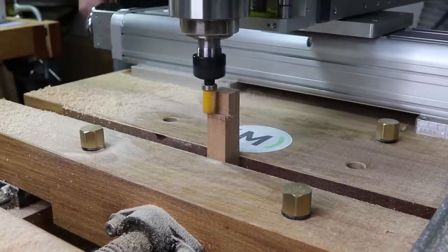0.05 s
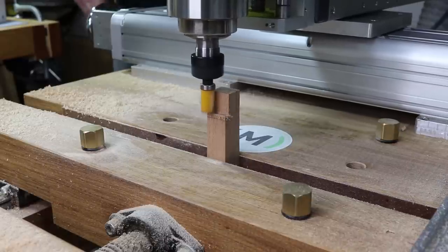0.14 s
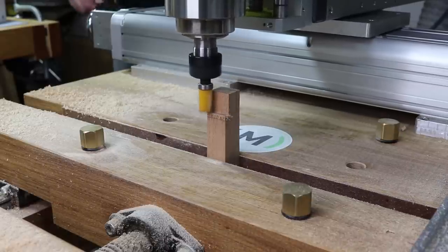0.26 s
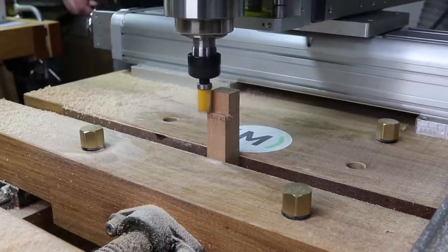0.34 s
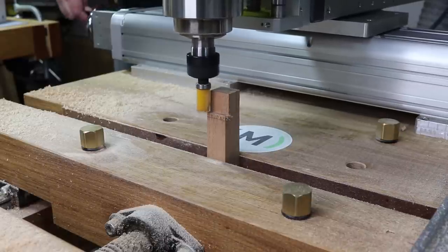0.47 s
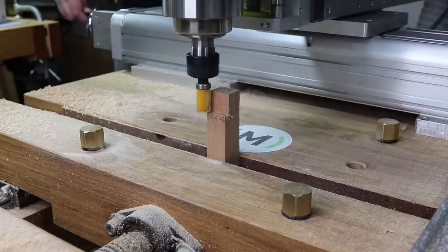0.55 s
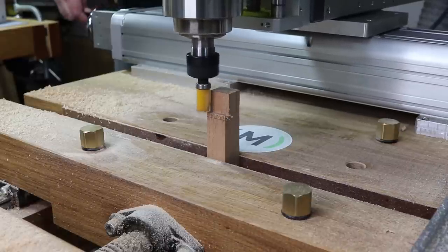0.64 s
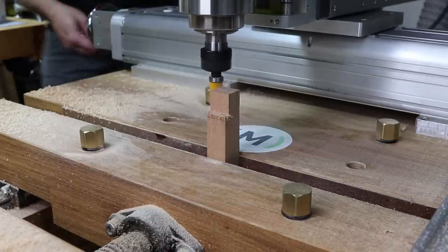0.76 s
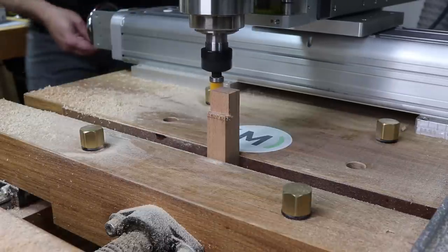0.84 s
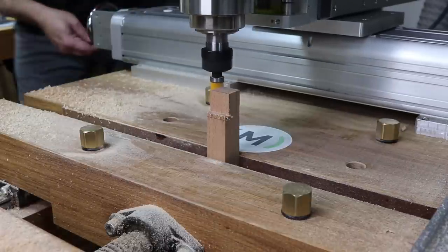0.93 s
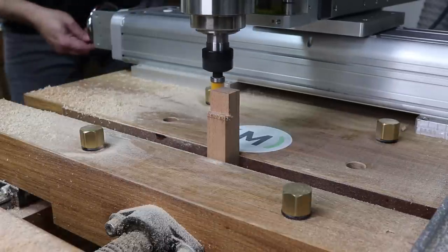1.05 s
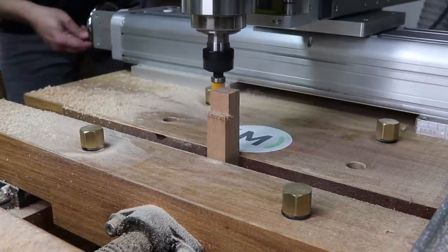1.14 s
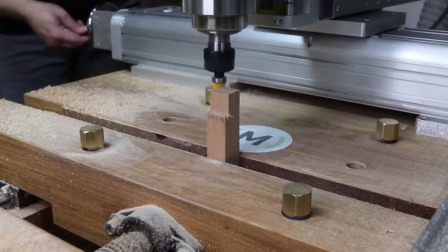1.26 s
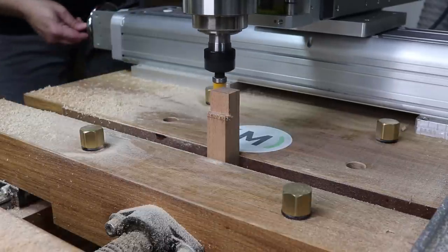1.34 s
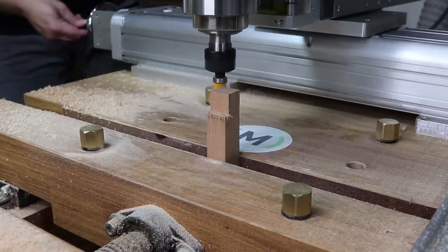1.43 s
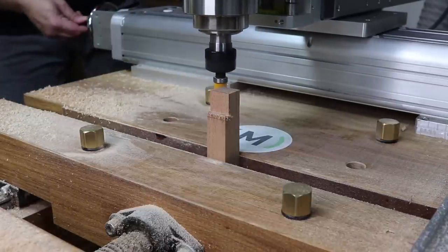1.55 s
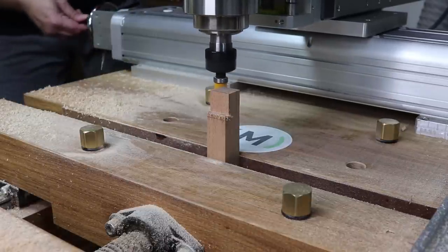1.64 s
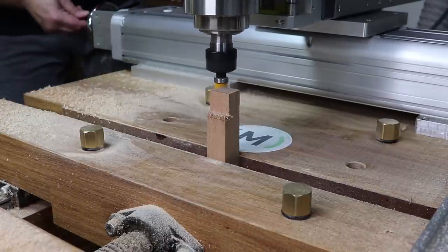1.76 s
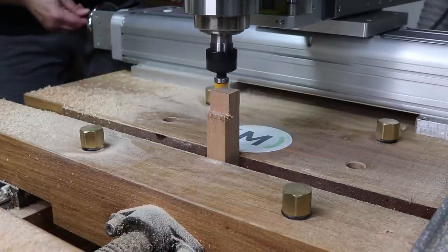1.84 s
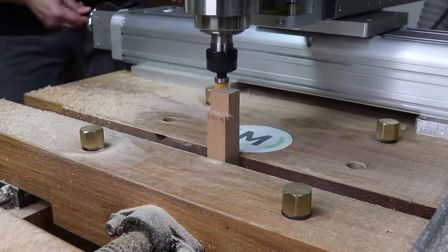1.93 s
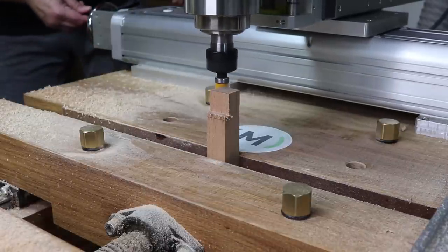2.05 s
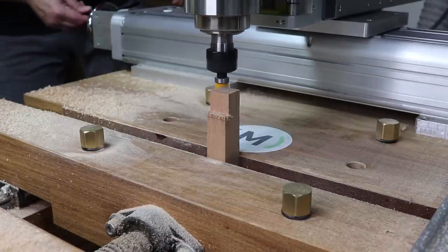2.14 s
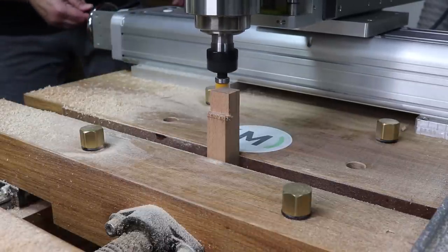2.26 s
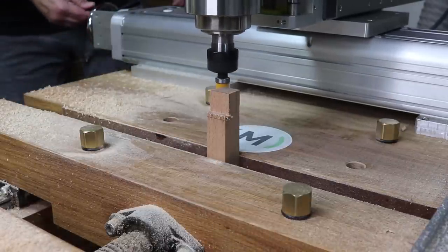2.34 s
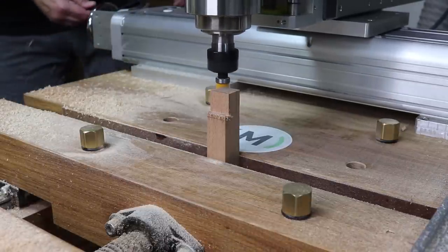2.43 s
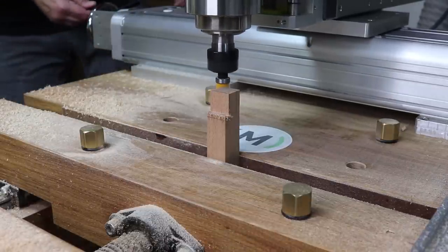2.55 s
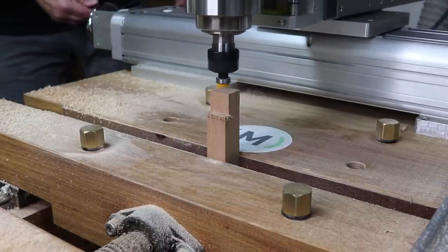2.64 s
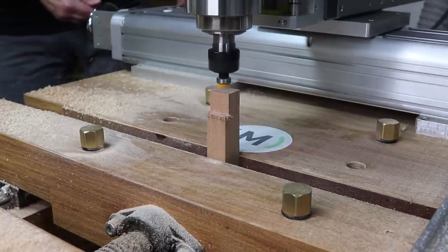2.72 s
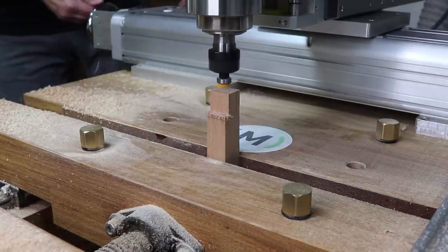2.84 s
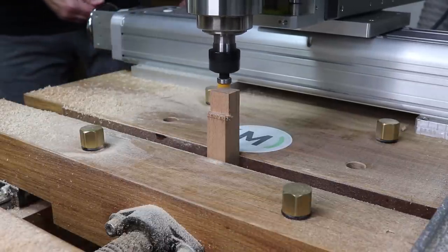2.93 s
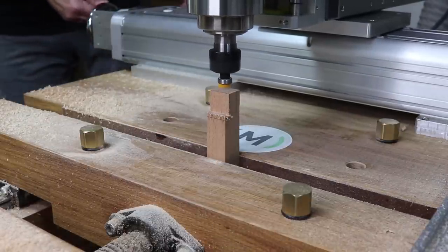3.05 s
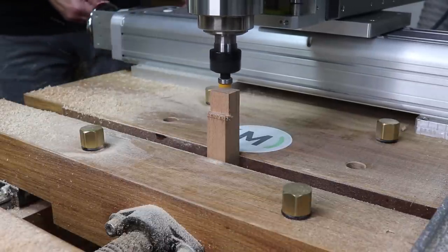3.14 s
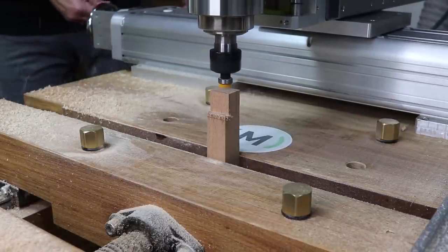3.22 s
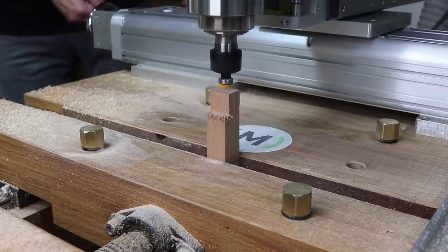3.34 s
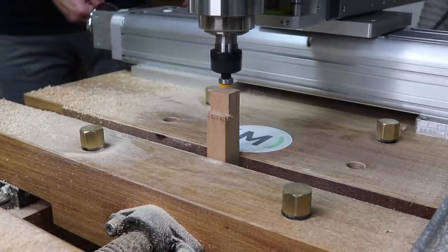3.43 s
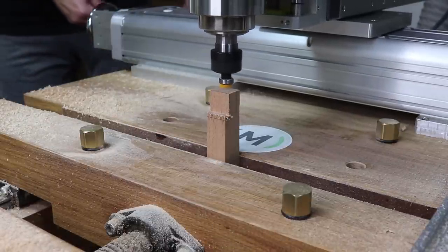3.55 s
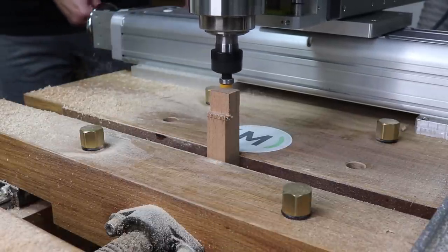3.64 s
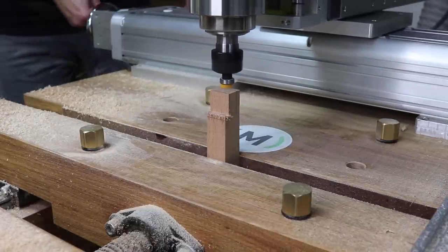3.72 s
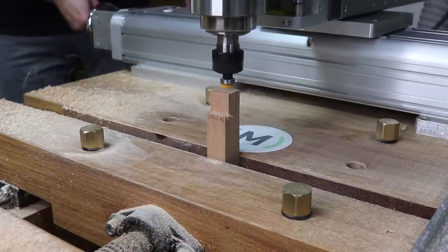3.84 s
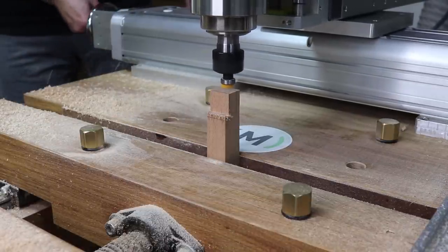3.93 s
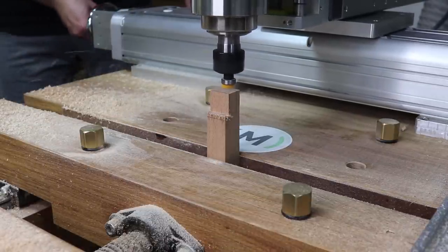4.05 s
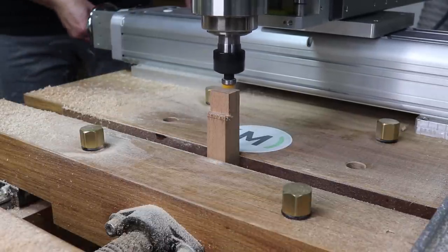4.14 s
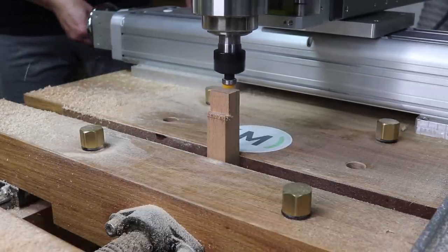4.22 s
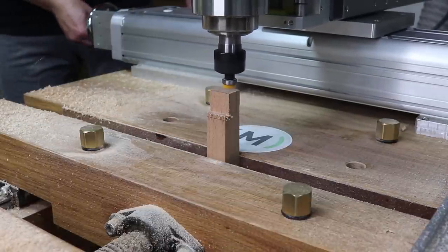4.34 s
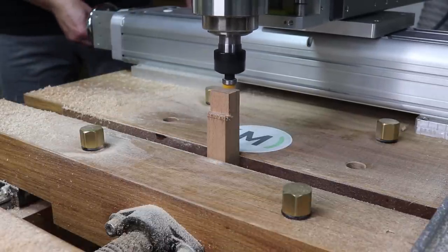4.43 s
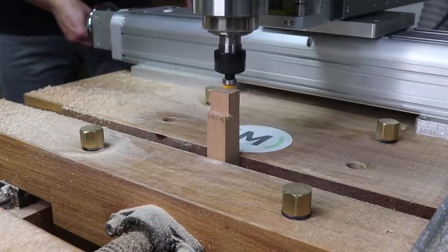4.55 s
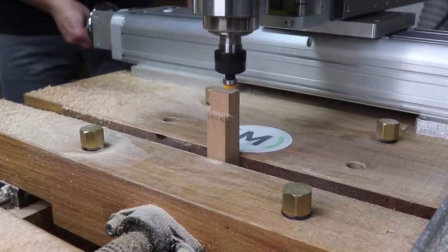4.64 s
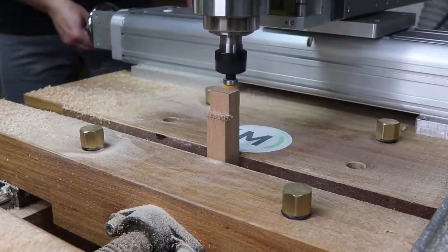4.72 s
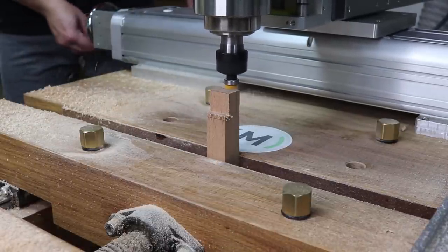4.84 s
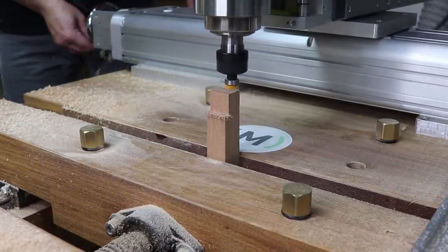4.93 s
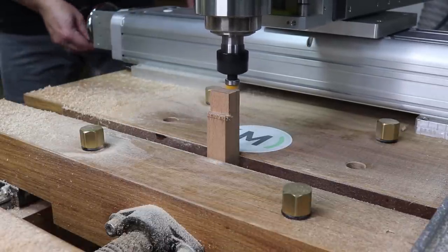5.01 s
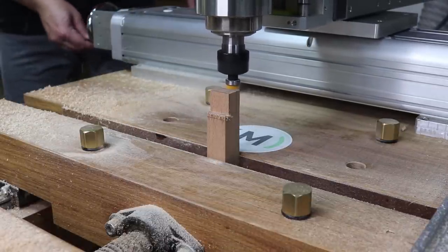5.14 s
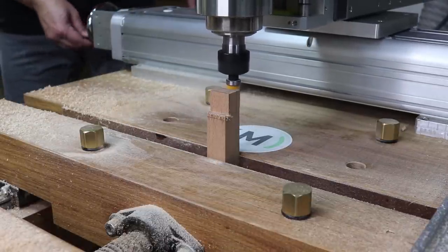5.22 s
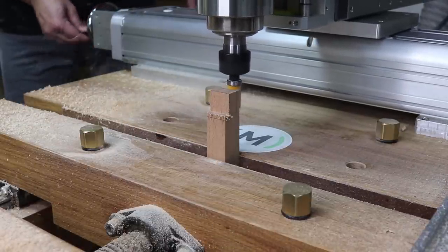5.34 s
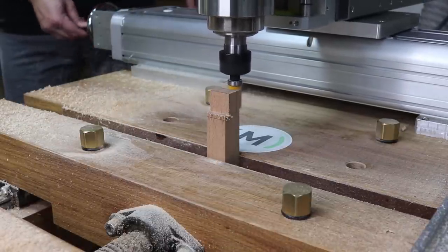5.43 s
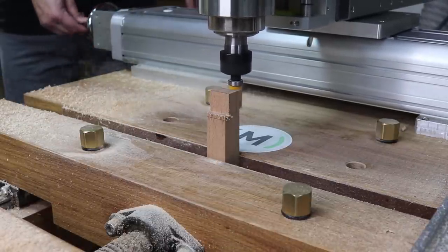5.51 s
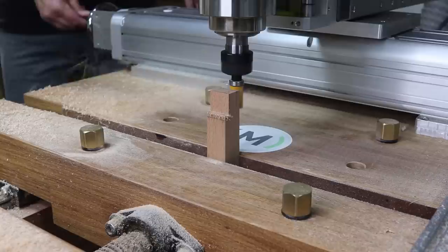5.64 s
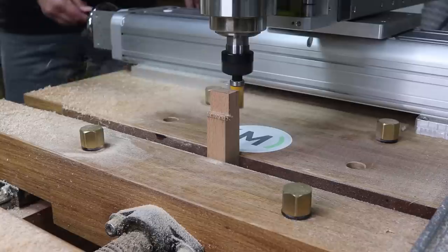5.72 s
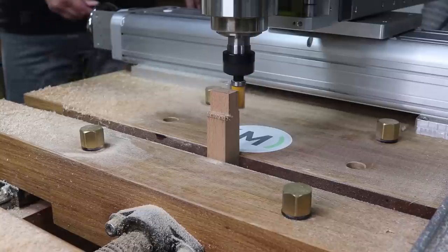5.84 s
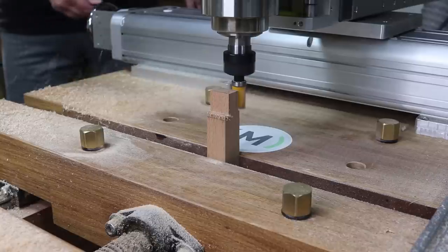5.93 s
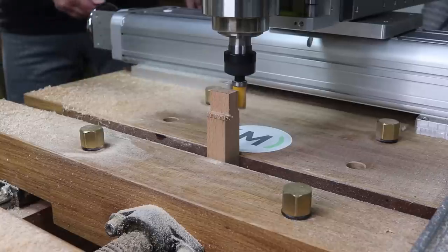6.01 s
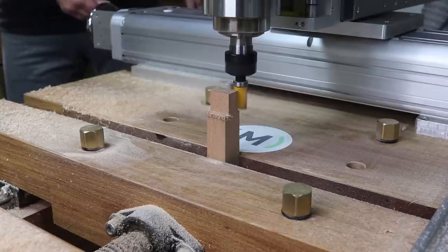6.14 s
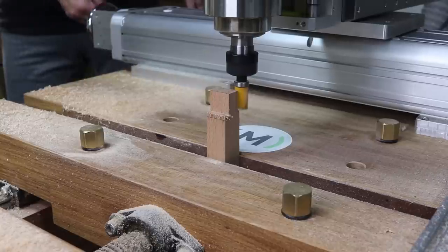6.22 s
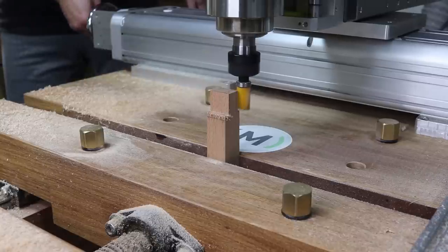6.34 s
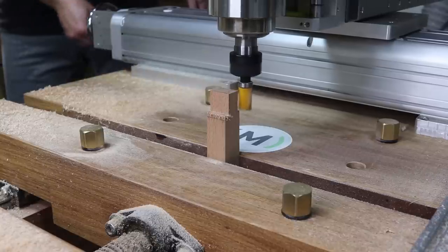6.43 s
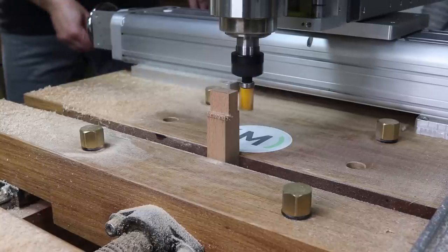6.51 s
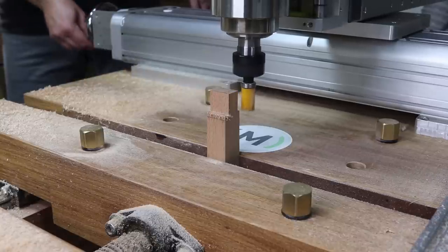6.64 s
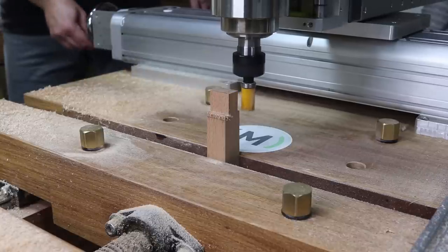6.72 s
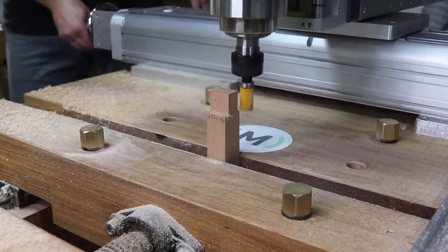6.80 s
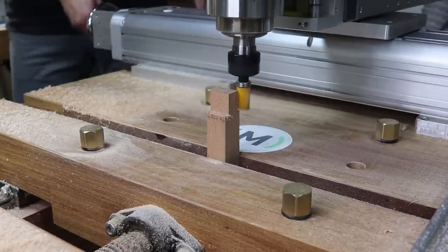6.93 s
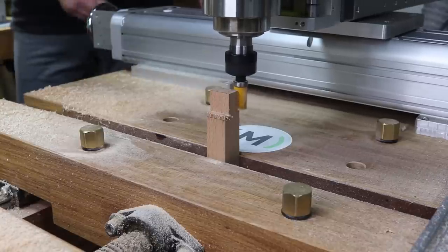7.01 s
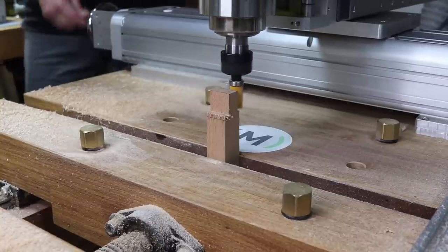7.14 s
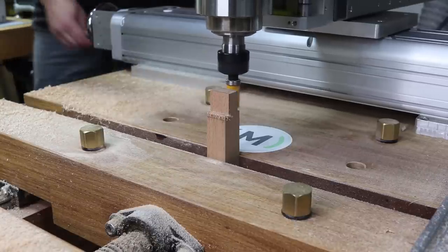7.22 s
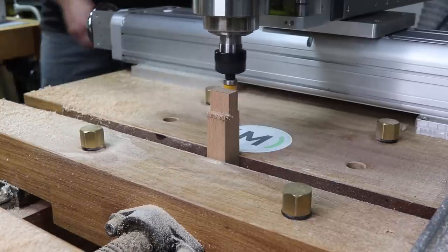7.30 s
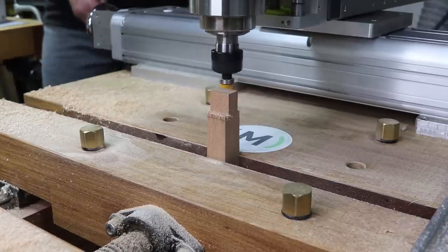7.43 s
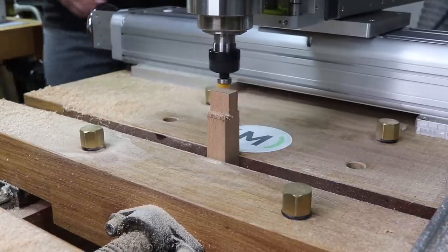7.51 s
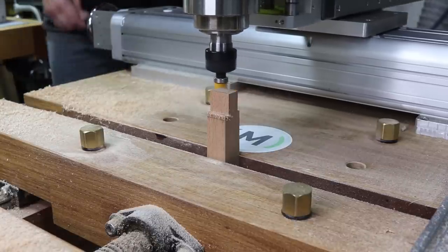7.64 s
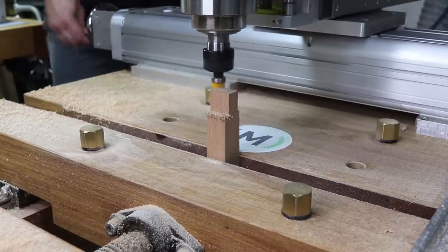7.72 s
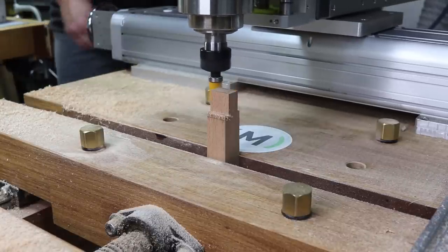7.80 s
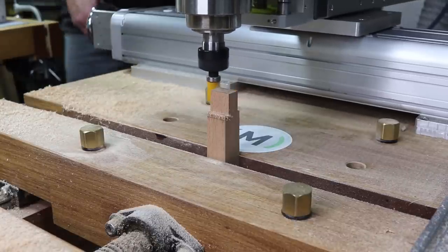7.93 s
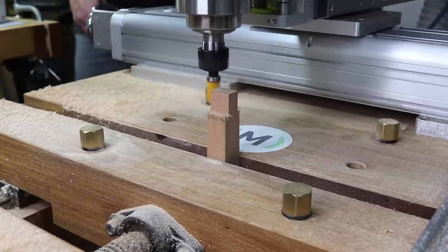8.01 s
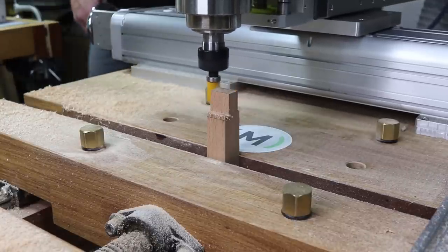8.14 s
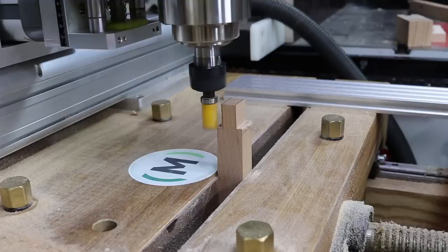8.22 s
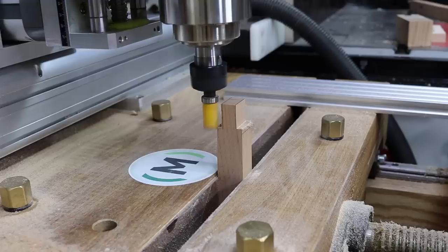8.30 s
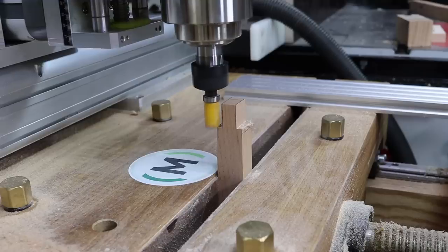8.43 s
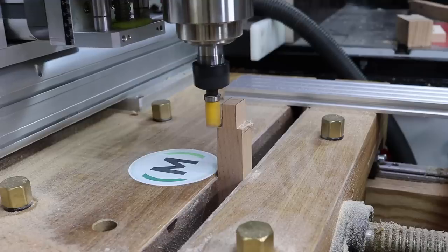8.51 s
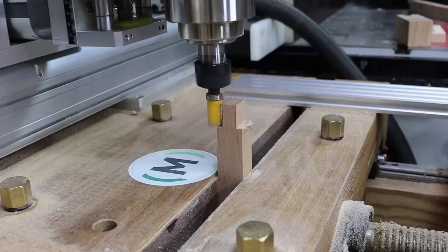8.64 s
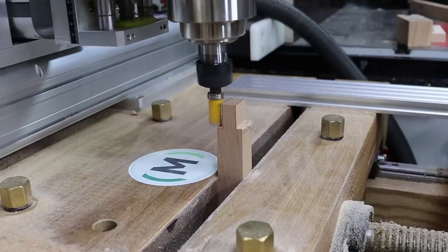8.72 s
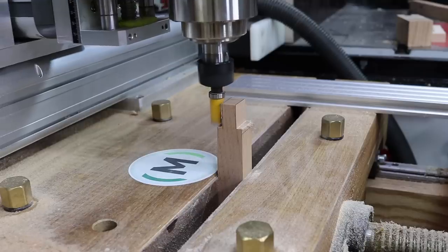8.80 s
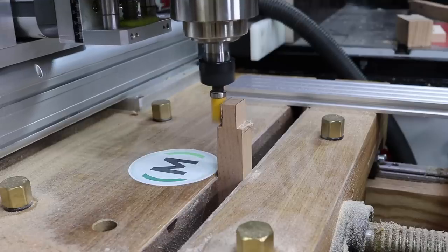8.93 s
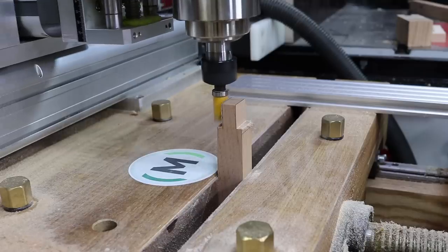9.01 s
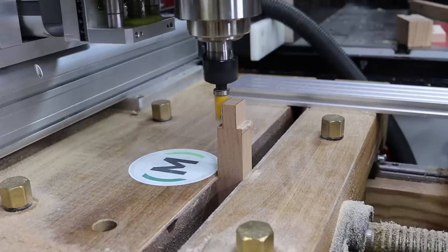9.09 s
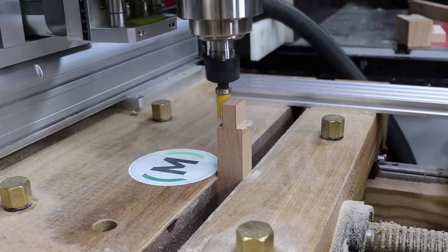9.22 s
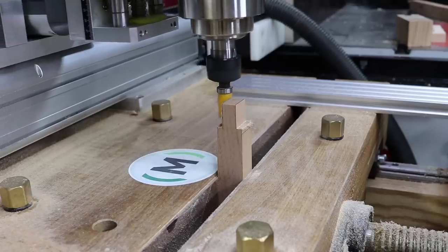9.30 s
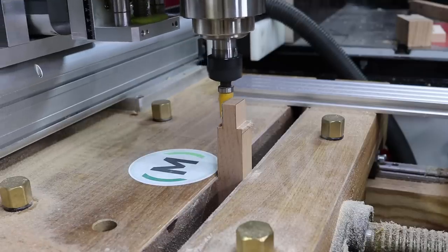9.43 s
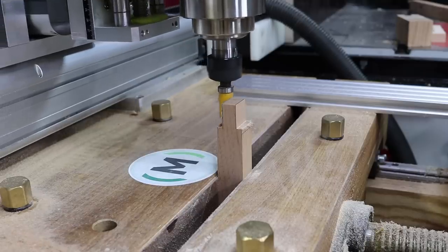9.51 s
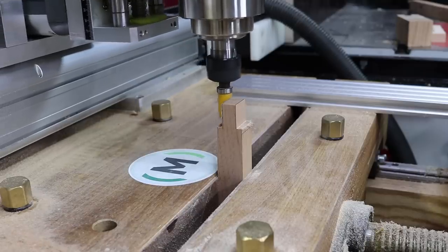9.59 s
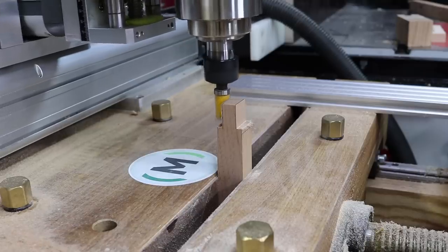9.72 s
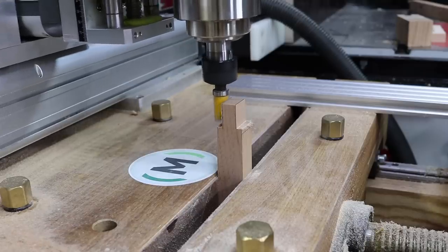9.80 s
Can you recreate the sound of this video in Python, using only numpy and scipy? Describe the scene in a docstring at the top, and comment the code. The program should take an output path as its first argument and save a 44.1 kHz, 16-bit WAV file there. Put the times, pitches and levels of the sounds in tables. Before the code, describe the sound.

Close stereo pickup of a small milling machine cutting an upright wooden post. A steady high whine and broad air hiss never stop. The bit skims with a fading buzz, pauses, then bites hard in surges with rough chatter, gritty chips and a piercing squeal. After it clears, two brief skims follow; from another position come a smooth buzzing cut and a final short touch.

```python
"""A two-flute router bit mills a wooden post; its seven-blade fan whines over rushing air throughout.
First a light pass adds shaft overtones. Then comes the deep pass, fed in pushes: the post chatters and
rings, side tones surround each overtone, chips rasp, and for a while the bit squeals.
Two more light passes follow; the microphone then changes place and hears two clean cuts with chips.
Most tones are sines locked to one shaft angle; air, chips and machine rumble are shaped stereo noise."""
import sys
import numpy as np
from scipy import signal
from scipy.fft import rfft, irfft, next_fast_len
from scipy.io import wavfile
from scipy.ndimage import uniform_filter1d

SR = 44100
rng = np.random.default_rng(int(sys.argv[2]) if len(sys.argv) > 2 else 0)


def to_wav(s):
    """Save 16-bit WAV."""
    ch = np.atleast_2d(s).T  # columns
    pcm = np.round(np.clip(ch, -1, 1) * 32767)  # PCM
    wavfile.write(sys.argv[1], SR, pcm.astype(np.int16))


N = 434805
BLADES = 7
MOVED = np.arange(N) > 8.29 * SR  # true once the microphone has changed place
# shaft multiples that the flutes excite, one row each in the tone tables; the fan covers 7 and 14
MULTIPLES = [k for k in range(2, 43) if k not in (7, 14)]
# squeal course: t/s, lowest ringing f/Hz, level/dB added to each tone, roughness/0-1
SQUEAL = [(4.24, 8200, -26, 0.08), (4.3, 8200, -12, .3), (4.36, 8200, -1.5, 0.1), (4.6, 8200, -1.5, .02),
          (4.66, 7320, 1, 0.03), (4.8, 8800, -1, 0.24), (4.95, 11200, -4, 0.85), (5.1, 12200, 0, 0.7),
          (5.35, 13300, -12, 0.7), (5.5, 13870, -29, .5)]
# stereo place of each flute overtone at the first place: left-right/dB, left lead/rad
FIRST_PLACE = [(5, 1.2), (6, -0.5), (-2, -1.5), (-3.5, 1.4), (-0.5, 1.25), (4.5, 0), (1, 0.3), (0, 1.1),
               (1, 0.2), (-4, 0), (22, 2.5), (-10, -7), (6, 3), (-15, 5), (-17, 2.5), (11, -6.5), (-6, 1.5),
               (1, -1), (7, 1.7), (-6, -6), (14, 0.8), (10, -3), (-14, 6.5), (2, 0), (4, -1.5), (2, 1),
               (-3, 0.06), (6, -6), (10, 6), (-1, -13), (6, 10), (2, -7), (1, 0), (3, 0.3), (5, -2), (4, 1),
               (7, 3.5), (5, 0.0), (5, 1)]
# the hand feeds in pushes: start/s, length/s, build-up/s, tone surge/dB, low overtones/dB,
# high overtones/dB, chatter/dB, chips/dB and post ring/dB at start, at end (chips and ring before trims)
PUSHES = [(1.455, 0.61, .17, 4, 0, -2.5, -0.5, -33, -54, -47),
          (2.26, 0.17, 0.092, 8, -2.5, -4, 2, -30.5, -39, -37),
          (2.642, 0.19, 0.09, 8.5, -3.5, -6.5, 2, -28, -31, -34),
          (2.985, .22, 0.11, 6.5, -1, -6, 2.5, -28.5, -35, -29),
          (3.31, 0.23, 0.045, 3.5, 1.5, -2.5, 0, -29.5, -32, -35),
          (3.574, 0.8, 0.072, 2.5, .5, -2, 1, -28.5, -28.5, -34),
          (4.585, 1.36, 0.1, 4, 0.5, -1, -0.5, -28.5, -29.5, -27)]


def amp(db):
    """Gain of a level in dB."""
    return 10 ** (np.asarray(db) / 20)


def unit(x):
    """x at rms 1."""
    return x / np.sqrt(np.mean(np.abs(x) ** 2) + 1e-20)


def along(points, hz):
    """Read (Hz, value) points on a log frequency axis."""
    f, v = np.transpose(points)
    return np.interp(np.log(hz + 1), np.log(f + 1), v)


def curves(rows, part=slice(None)):
    """One value per sample for each column after the time."""
    s, *cols = np.transpose(rows)
    return [np.interp(np.arange(N)[part] / SR, s, c) for c in cols]


def span(rows):
    """The samples between a table's first and last time."""
    return slice(int(rows[0][0] * SR), int(rows[-1][0] * SR))


def wobble(rate, size=N):
    """A random curve with `rate` knots a second."""
    knots = rng.standard_normal(int(N * rate / SR) + 4)
    return np.interp(np.arange(size) * rate / SR, np.arange(len(knots)), knots)


def filtered(x, response):
    """x times a response of frequency."""
    m = next_fast_len(N + 8192)
    return irfft(rfft(x, m) * response(np.fft.rfftfreq(m, 1 / SR)), m)[..., :N]


def rush(spectrum, alike, patchy_db):
    """Shaped stereo noise of rms 1, with patches of random gain in time and frequency."""
    z = signal.stft(rng.standard_normal((2, N)), nperseg=512)[2]
    field = rng.standard_normal(z.shape[1:])
    field = uniform_filter1d(uniform_filter1d(field, size=6, axis=0), size=12, axis=1)
    pair = signal.istft(z * amp(patchy_db * unit(field)), nperseg=512)[1][:, :N]

    def mid_side(hz):
        # the mid-side mix angle sets how alike left and right are
        turn = np.arccos(np.clip(along(alike, hz), -1, 1)) / 2
        return amp(along(spectrum, hz)) * [np.cos(turn), np.sin(turn)]

    mid, side = filtered(pair, mid_side)
    return unit(np.array([mid + side, mid - side]))


def placed(tone, pan_db, lead):
    """A complex tone in stereo by level and phase difference; a tone of modulus 1 gets rms 1."""
    left = 2 / np.sqrt(1 + amp(-2 * pan_db)) * (tone * np.exp(1j * lead)).real
    return np.array([left, 2 / np.sqrt(1 + amp(2 * pan_db)) * tone.real])


def overtone(angle, multiple, waver_db, drift):
    """One shaft overtone whose level and phase wander, more so on high multiples."""
    size = len(angle)
    wander = np.log(amp(waver_db)) * wobble(9, size) + 1j * drift * wobble(16, size)
    phase = multiple * angle + rng.uniform(0, 2 * np.pi)
    return np.exp(1j * phase + wander * (1 + multiple / 30))


def fan_whine(angle):
    """Fan blades sound at the blade rate and its octave; turbulence makes both flutter."""
    # t/s, whine level/dB, whine left-right/dB, octave level/dB (levels before small trims)
    whine_course = [(0, -27, -4.5, -36.5), (.7, -27.5, -7, -40.5), (.78, -30.5, -9, -46.5),
                    (1.3, -29.5, -6.5, -46), (1.45, -29, -3.5, -35), (1.8, -29.5, -2.5, -48),
                    (2.0, -29, -3, -35.5), (2.4, -30, -2, -36), (2.65, -29, -3.5, -44.5),
                    (6.5, -28.5, -5, -42.5), (7.1, -28, -6, -44.5), (7.6, -30, -4, -38),
                    (7.7, -31.5, -6, -48.5), (8.25, -28.5, -4.5, -48.5), (8.32, -31, -1, -42),
                    (9, -33, 4, -50.5), (9.86, -32.5, 1, -40.5)]
    whine_db, pan_db, octave_db = curves(whine_course)
    flutter = amp(0.32 * wobble(45)) * np.exp(.15j * wobble(40))
    whine = flutter * np.exp(1j * BLADES * angle)
    octave = flutter * np.exp(2j * BLADES * angle)
    out = amp(whine_db - 0.4) * placed(whine, pan_db, np.where(MOVED, .3, .25))
    return out + amp(octave_db + 0.3) * placed(octave, np.where(MOVED, 1.5, 8), 0.25)


def deep_pass(angle):
    """The flutes, the post and the chips share one chatter beat and the pushes of the hand."""
    # start and end of the pass: t/s
    pass_times = [(1.3,), (6.5,)]
    # chatter against the flutes, around which the beat wanders: t/s, f/Hz
    beat_course = [(1.4, 52.4), (2.3, 51.23), (3.5, 49.13), (6.4, 48.53)]
    part = span(pass_times)
    turn, out, rasp = angle[part], np.zeros((2, N)), np.zeros(N)
    low_db, high_db, chatter_db, chips_db, ring_db = feed(part)
    beat_hz = curves(beat_course, part)[0] + 1.216 * wobble(6, len(turn))
    beat = np.exp(2j * np.pi * np.cumsum(beat_hz) / SR)
    out[:, part] += chattering_flutes(turn, part, beat, low_db, high_db, chatter_db)
    out[:, part] += side_tone_and_post_ring(turn, part, beat, ring_db)
    rasp[part] = amp(chips_db - 2.5) * (1 + 0.086 * amp(chatter_db) * beat.real)
    return out + chips(angle, rasp, patchy_db=1.2)


def chattering_flutes(turn, part, beat, low_db, high_db, chatter_db):
    """Chatter modulates the flute overtones, putting side tones one beat below and above each."""
    # overtones: level/dB entering, level/dB further on
    tone_levels = [(-57, -49), (-55.5, -48), (-37, -36), (-32, -42), (-45, -41), (-50, -39.5), (-47, -46.5),
                   (-46, -43), (-36, -47), (-43.5, -54.5), (-42, -62), (-50, -76), (-41, -40.5), (-51, -55),
                   (-39.5, -45.5), (-43, -52), (-38.5, -42.5), (-42, -60), (-55, -40.5), (-55, -63),
                   (-52, -46.5), (-61, -70), (-80, -49), (-55, -61), (-44.5, -48), (-47, -69),
                   (-48.5, -49.0), (-55, -61), (-61, -49), (-68, -70), (-65, -66), (-59, -72), (-56, -49),
                   (-69.0, -68.0), (-64.0, -66), (-64.0, -67.0), (-57, -64), (-71, -72.0), (-63.0, -64)]
    # side tones of multiples 2 to 22: lower level/dB, upper level/dB
    side_levels = [(-47.5, -42.5), (-58, -53.5), (-36, -56), (-44.5, -71), (-40, -40.0), (-58.5, -65),
                   (-37.5, -52), (-53, -47), (-46, -55), (-46.5, -43.5), (-50, -68), (-58, -60),
                   (-49.5, -60.5), (-60, -78), (-65, -54), (-57, -55), (-62, -71), (-68, -55), (-45.5, -45),
                   (-82, -81), (-59, -66)]
    # how deep the bit is in the wood: t/s, depth/0 entering to 1 further on
    depth_course = [(2.6, 0.026), (3.74, 0.68)]
    # the wood thins towards the far edge: start t/s, end t/s
    thin_times = (5.68, 6.36)
    # change of the lowest ten overtones in thin wood: level/dB
    thin_changes = [1, -5, -1, 6.5, 4, 9, -2, 3.5, -6, 3]
    # the cut runs clean around the long pause: t/s, share/0-1
    ease_course = [(4.36, 0), (4.45, 0.95), (4.72, 0.82), (4.85, 0)]
    # change of the lowest ten overtones there: level/dB
    ease_changes = [2, 0, 1.5, 0, -1, -1, 5, 0.5, 5.5, 4]

    t = np.arange(N)[part] / SR
    depth = np.clip(curves(depth_course, part)[0], 0, 1)
    thin, ease = np.interp(t, thin_times, (0, 1)), curves(ease_course, part)[0]
    dull = amp(-4.5 * np.clip(t - 3.8, 0, None))  # dB per second after 3.8 s
    tones, follow_tone = {}, {}
    for k, (early, late) in zip(MULTIPLES, tone_levels):
        tones[k] = amp(early + depth * (late - early) + (low_db if k < 16 else high_db))
        if k <= 22:  # listed side tones partly follow their overtone
            follow_tone[k] = amp(0.41 * (0.87 - depth) * (early - late))
    for k, thin_db, ease_db in zip(MULTIPLES, thin_changes, ease_changes):
        tones[k] = tones[k] * amp(thin_db * thin + ease_db * ease)

    sides = dict(enumerate(amp(side_levels), 2))
    places = dict(zip(MULTIPLES, FIRST_PLACE))
    out = np.zeros((2, len(turn)))
    for multiple in range(2, 43):
        gain = tones.get(multiple, 0)
        under, over = sides.get(multiple, (0.45 * gain, 0.23 * gain))
        # high overtones throb nearly together; low ones throb at scattered random phases
        sway = beat * np.exp(1j * rng.normal(0, 1.8 if multiple < 8.5 else .35))
        side_gain = amp(chatter_db) * follow_tone.get(multiple, 1)
        if 10 < multiple < 16:
            side_gain = side_gain * dull
        pulse = gain + side_gain * (under / sway + over * sway)
        tone = overtone(turn, multiple, waver_db=1.66, drift=0.39)
        out += placed(tone * pulse, *places.get(multiple, (-1.5, .4)))
    return out


def side_tone_and_post_ring(turn, part, beat, ring_db):
    """Two close tones ring unsteadily: a chatter side tone near 1965 Hz and the post's ring at 1987 Hz."""
    # the side tone and the post's ring: f/Hz
    ring_tones = (1965, 1987)
    # the cut shifts the post's ring: shaft multiples, beats, level/dB
    ring_sides = [(-3, 0, -23), (-2, -1, -10.5), (-1, 1, -7.5), (0, 1, 1), (1, 0, -5), (2, 1, -3),
                  (3, 0, -22), (6, 1, -21)]
    t, size = np.arange(N)[part] / SR, len(turn)
    side_tone, ring = (amp(3.6 * wobble(22.13, size)) * np.exp(2j * np.pi * hz * t + .6j * wobble(25, size))
                       for hz in ring_tones)
    shifted = 1
    for multiple, beats, db in ring_sides:
        shifted = shifted + amp(db) * np.exp(1j * round(multiple) * turn) * beat ** round(beats)
    return amp(ring_db - 7) * placed(1.02 * side_tone + ring * shifted, 3.3, 1.54)


def feed(part):
    """dB of low and high overtones, chatter, chips and post ring, driven by the hand's pushes."""
    enter_s, leave_s = 1.37, 6.29  # the flutes touch and clear the post
    enter_db_per_s, leave_db_per_s = 250, 231
    graze_db = -5  # low overtones between the touch and the first push
    # how layers follow a push: delay as share of the build-up, rise dB/s, fall dB/s
    chatter_law, chips_law, ring_law = (1.2, 190, 65), (0.65, 160, 44), (0.69, 200, 67)

    t = np.arange(N)[part] / SR
    start, length, build, surge, low, high, chatter, chips_db, ring, ring_end = np.transpose(PUSHES)
    push = np.clip(np.searchsorted(start, t) - 1, 0, None)
    since = np.clip(t - start[push], 0, None)
    edge = enter_db_per_s * np.clip(enter_s - t, 0, None) + leave_db_per_s * np.clip(t - leave_s, 0, None)
    jump = surge[push] * np.exp(-(since / (1.5 * build[push])) ** 2)
    low_db = np.where(t < start[0], graze_db, low[push] + jump)
    lift = 3.5 * amp(curves(SQUEAL, part)[1])  # dB, high overtones gain while the bit squeals
    high_db = high[push] + 0.83 * jump + lift

    def smooth(db):
        return uniform_filter1d(db, size=1800) - edge

    return (smooth(low_db), smooth(high_db), follow(t, chatter_law, chatter, chatter),
            follow(t, chips_law, chips_db, chips_db), follow(t, ring_law, ring, ring_end))


def follow(t, law, first, last):
    """dB of a layer that rises as each push builds, holds or glides, and falls when it stops."""
    delay, rise, fall = law
    start, length, build = np.transpose(PUSHES)[:3, :, None]
    hold = first[:, None] + (last - first)[:, None] * np.clip((t - start) / length, 0, 1)
    before = np.clip(start + delay * build - t, 0, None)
    after = np.clip(t - start - length, 0, None)
    return np.max(hold - rise * before - fall * after, axis=0)


def squeal(angle):
    """The bit rubs and sings on even multiples, odd ones weak as both flutes act alike; it roughens and thins."""
    # even shaft multiples 20 to 42: level/dB, left-right/dB, left lead/rad
    squeal_tones = [(-47, 5, 0.91), (-33, -5, .5), (-37, 0, 0.42), (-28, -4, 2.3), (-28, -23, .5),
                    (-31.5, 18, 0.65), (-33, -8, .5), (-36, 5, .5), (-37, 7, .5), (-39, 5, .5),
                    (-45, 5, .5), (-52, 6, .5)]
    part, out = span(SQUEAL), np.zeros((2, N))
    turn = angle[part]
    size = len(turn)
    low_hz, level_db, rough = curves(SQUEAL, part)
    stutter = amp(rough * 4.4 * wobble(70.4, size))
    for multiple, (db, pan_db, lead) in zip(range(20, 43, 2), squeal_tones):
        fuzz = wobble(450, size) + 1j * wobble(450, size)
        low_cut = 1 + (low_hz / (364 * multiple)) ** 14  # the shaft turns near 364 Hz
        gain = amp(db + level_db) * stutter * (1 + rough * fuzz) / low_cut
        with_odd = 1 + amp(-15) * np.exp(1j * turn)
        pair = overtone(turn, multiple, waver_db=1.7, drift=.05) * with_odd
        out[:, part] += placed(gain * pair, pan_db, lead)
    return out


def light_passes(angle):
    """Shallow cuts heard from the first place: flute overtones alone."""
    # start/s, length/s, then level/dB at start, at end of low, high and highest overtones
    skims = [(.05, 0.74, -4.5, -15, -10, -21, -14, -21), (7.06, 0.15, 5, 3, -2.5, 0.5, -5, -5),
             (7.22, .39, 3, 3.5, -2, 0, -2, 6.5)]
    # overtones: level/dB
    skim_levels = [(-63), (-58), (-49.5), (-40), (-47.5), (-48), (-55), (-48), (-58), (-48.5), (-55), (-56),
                   (-38.5), (-47), (-41.5), (-50), (-43), (-43.5), (-42), (-50), (-45), (-58.0), (-48),
                   (-58.0), (-49), (-42.5), (-46), (-62), (-53), (-59), (-61), (-51), (-57), (-57), (-59),
                   (-65), (-61.0), (-69.0), (-69.0)]
    tones = [(db, *place) for db, place in zip(skim_levels, FIRST_PLACE)]
    return sum(clean_cut(angle, contact(*row), tones) for row in skims)


def second_place_cuts(angle):
    """Cuts heard from the second place: flute overtones and torn chips."""
    # start/s, length/s, then level/dB at start, at end of low, high and highest overtones and
    # of the chips (before a trim)
    side_cuts = [(8.555, 0.727, 1, -0.5, 0.64, -2.5, 4, -10.5, -38, -30.5),
                 (9.75, .1, -4.5, -9, 1, 4, -6, -14, -36, -34)]
    # overtones: level/dB, left-right/dB, left lead/rad
    side_tones = [(-45.5, 19, 2.4), (-44.5, 0, -0.8), (-32, 4, 0.1), (-35.5, 0, -2.5), (-24, -6.5, 0.3),
                  (-28, -4.5, 0.54), (-40, 1, 0.5), (-37, 2.5, -1), (-47, 2, 1.5), (-41, 8, -0.5),
                  (-62, -7, 3), (-42, 0, 8.7), (-40, 6, -2), (-44, 0, 1), (-41.5, -7, -5.5), (-44, 4, 1),
                  (-39.5, 2, -5), (-52, 7, 8), (-52, 0, -13), (-63, 1, 2), (-44.5, 0, 1.5), (-61, 4, 5),
                  (-53, 3, 1), (-57.0, -5, -13), (-44, 8, -4), (-42, -3, -6.5), (-44, 8, -1.5),
                  (-45, -5, -6), (-51, -2, -1.5), (-50, 3, 6), (-60, 8, 14), (-61.0, 2, -4), (-60, 2, 2),
                  (-63.0, 1, -3.0), (-57, 2, 1.2), (-65.0, 2, 0.1), (-62, 0, -4), (-70.0, 2, 2.4),
                  (-53, 5, 3.5)]
    cuts = [contact(*row) for row in side_cuts]
    out = sum(clean_cut(angle, rows, side_tones) for rows in cuts)
    chips_db = curves(cuts[0] + cuts[1])[3]
    return out + chips(angle, amp(chips_db - 2.5), patchy_db=1.5)


def clean_cut(angle, rows, tones):
    """Flute overtones of a cut without chatter, in three bands of level."""
    part, out = span(rows), np.zeros((2, N))
    low_db, high_db, top_db = curves(rows, part)[:3]
    for multiple, (db, pan_db, lead) in zip(MULTIPLES, tones):
        band_db = low_db if multiple < 16 else high_db if multiple < 27 else top_db
        tone = overtone(angle[part], multiple, waver_db=1.4, drift=0.13)
        out[:, part] += amp(db + band_db) * placed(tone, pan_db, lead)
    return out


def contact(start, length, *levels):
    """Curve rows of one clean cut: touch, settle, hold or glide, clear."""
    touch_s, settle_s, clear_s = 0.026, 0.043, 0.06
    off_db = 37  # drop outside the cut
    first, last = np.array(levels[::2]), np.array(levels[1::2])
    touch = [first[0] - 8, *first[1:]]  # low overtones arrive late
    return [(start, *first - off_db), (start + touch_s, *touch), (start + touch_s + settle_s, *first),
            (start + length, *last), (start + length + clear_s, *last - off_db)]


def chips(angle, gain, patchy_db):
    """Torn fibres: a noise rasp that swells twice a turn, as each flute bites."""
    # colour before normalising: f/Hz, level/dB per Hz
    chip_colour = [(350, -59), (600, -38), (727, -15), (1010, -23), (1420, -9.5), (2390, -9), (2590, -8.5),
                   (3100, -9), (4120, -12), (5500, -18.5), (7430, -14), (15800, -31.5)]
    # f/Hz, left-right likeness/0-1
    chip_alike = [(500, 0.63), (2000, 0.59), (6000, 0.65), (15000, .4)]
    bite = (1 + .5 * np.cos(2 * angle)) * gain
    return filtered(bite * rush(chip_colour, chip_alike, patchy_db),
                    lambda hz: 1 / (1 + (450 / (hz + 1)) ** 6))


def unbalance_and_fan_tones(angle):
    """Unbalance tones at once and twice the shaft rate, and the fan's third and fourth blade harmonics."""
    # shaft multiples
    tone_multiples = (1, 2, 21, 28)
    # first place: level/dB, left-right/dB, left lead/rad; then the same three at the second place
    tone_places = [(-56, 3.5, 0.13, -47, 1.5, .1), (-54.5, -11, 0.091, -65, 7.9, .3),
                   (-56.5, -2, 0.25, -51.5, 2, .3), (-62.5, 1, .3, -65, 3, .3)]
    out = np.zeros((2, N))
    for multiple, place in zip(tone_multiples, tone_places):
        db, pan, lead = np.where(MOVED, np.reshape(place[3:], (-1, 1)), np.reshape(place[:3], (-1, 1)))
        out += amp(db) * placed(overtone(angle, multiple, waver_db=2.0, drift=0.39), pan, lead)
    return out


def cooling_air():
    """Air driven by the fan: patchy noise whose colour depends on the microphone's place."""
    # t/s, level/dB before each place's lift
    air_course = [(0.03, -43), (1.23, -44.5), (1.55, -43.5), (7.59, -44), (9.83, -44.5)]
    # colour at the first place before normalising: f/Hz, level/dB per Hz
    first_colour = [(200, -42), (330, -11.5), (600, -8), (780, -0.5), (950, -0.5), (1100, -9.5),
                    (1300, -0.5), (1650, -5.5), (1800, 0.5), (2200, -7), (2450, 7), (2750, 2), (3150, 3.5),
                    (3400, -8.5), (4150, -6.5), (4400, -3), (5100, -2.5), (5300, -7), (7900, -8),
                    (8300, -12.5), (11000, -17), (15800, -30.5)]
    # colour at the second place before normalising: f/Hz, level/dB per Hz
    second_colour = [(200, -40), (330, -14), (600, -10), (780, 1.5), (1050, -6.5), (1600, -5.5),
                     (1800, -3.5), (2250, -2), (2450, 7), (2750, -2.5), (3150, 0.5), (3400, -9.5),
                     (4100, -10), (4350, -4), (5100, -2), (5300, -16), (5700, -6.5), (7900, -9),
                     (8500, -9.5), (11000, -15.5), (15800, -28)]
    # f/Hz, left-right likeness/0-1
    air_alike = [(60, 0.99), (180, 0.69), (550, 0.93), (1650, 0.6), (4970, 0.4), (15000, 0.13)]
    # balance at the first place: f/Hz, left-right/dB
    air_balance = [(60, 2), (180, 0), (550, 0.0), (1650, 1.5), (4970, 0), (15000, 1.5)]
    first = rush(first_colour, air_alike, patchy_db=1.1)
    first = filtered(first, lambda hz: amp(np.outer([.5, -.5], along(air_balance, hz))))
    second = rush(second_colour, air_alike, patchy_db=2.0)
    air = np.where(MOVED, amp(11.5) * second, amp(11.0) * first)
    return amp(curves(air_course)[0]) * air


def frame_rumble():
    """The machine frame rumbles: low noise, nearly alike on both sides."""
    # colour before normalising: f/Hz, level/dB per Hz
    rumble_colour = [(20, -13), (110, -13.5), (150, -2), (190, 1.5), (230, -2), (300, -3), (340, -30.5)]
    return amp(-65.0) * rush(rumble_colour, [(30, 0.89), (200, 1.0)], patchy_db=1.0)


def scene():
    """Fan and flutes turn with one shaft, over air and rumble."""
    # blade rate, sagging under load: t/s, f/Hz
    blade_rate = [(0, 2555), (1.35, 2555), (1.7, 2550), (2.5, 2550), (3.1, 2546), (4.3, 2546), (4.45, 2549),
                  (4.65, 2547), (5.9, 2546), (6.3, 2549), (6.6, 2551), (8.55, 2550), (8.7, 2547),
                  (9.28, 2547), (9.4, 2551), (9.86, 2550)]
    angle = 2 * np.pi * np.cumsum(curves(blade_rate)[0]) / BLADES / SR
    out = fan_whine(angle) + deep_pass(angle) + squeal(angle)
    out += light_passes(angle) + second_place_cuts(angle)
    return out + unbalance_and_fan_tones(angle) + cooling_air() + frame_rumble()


def record(dry):
    """A steep band limit: nothing is kept from 15850 Hz up."""
    return filtered(dry, lambda hz: hz < 15850)


dry = scene()
out = record(dry)
to_wav(out)
```